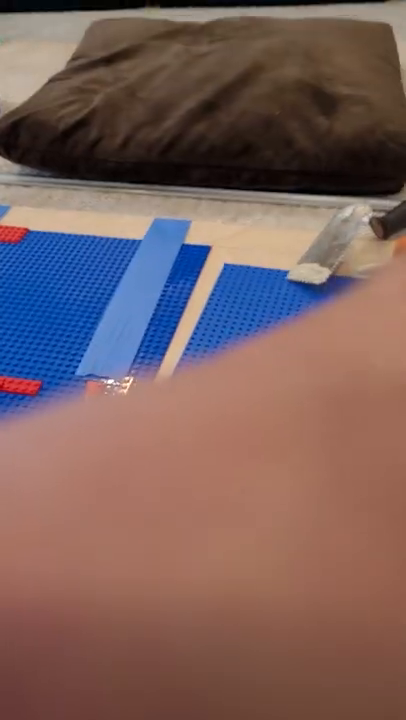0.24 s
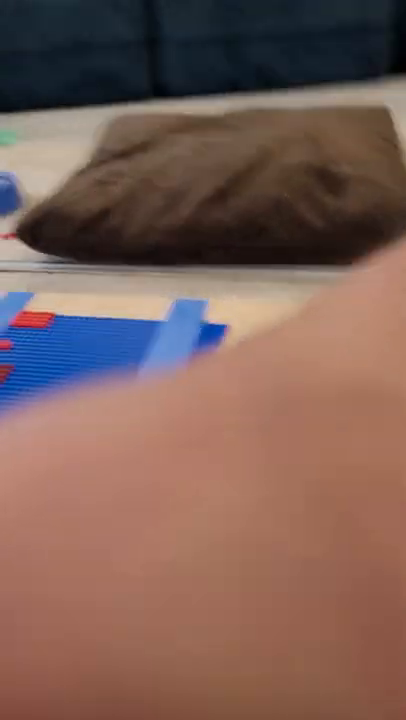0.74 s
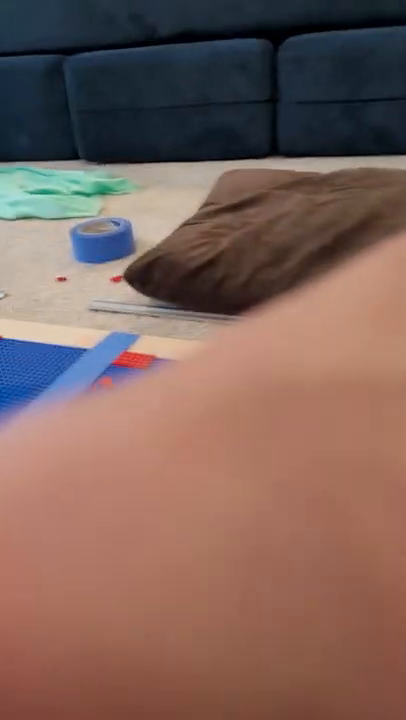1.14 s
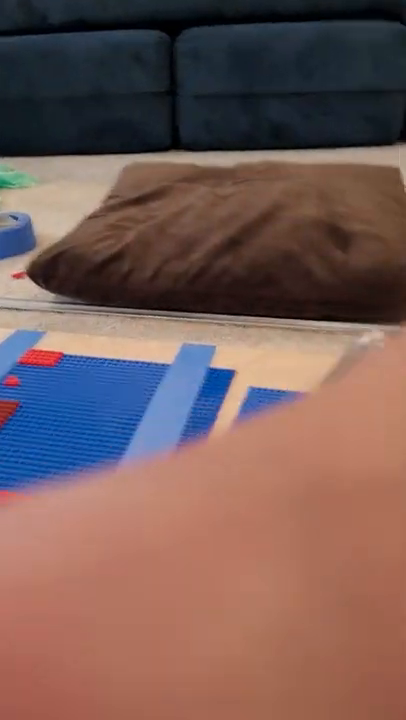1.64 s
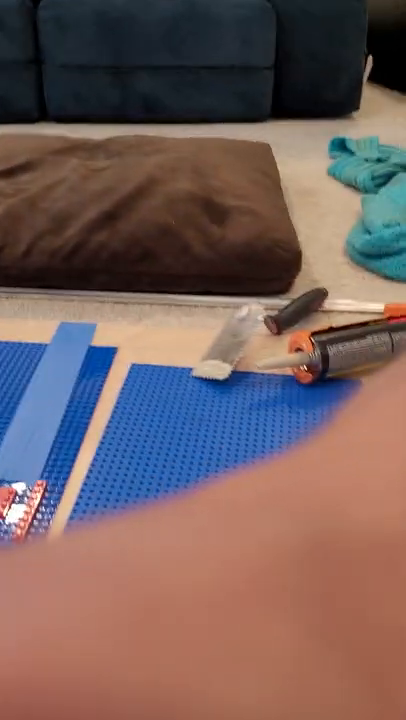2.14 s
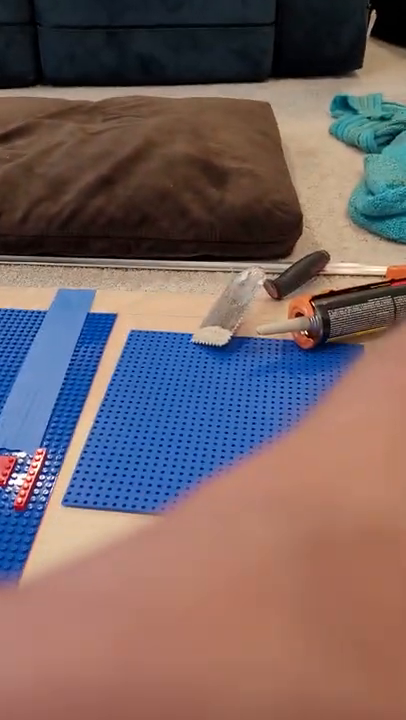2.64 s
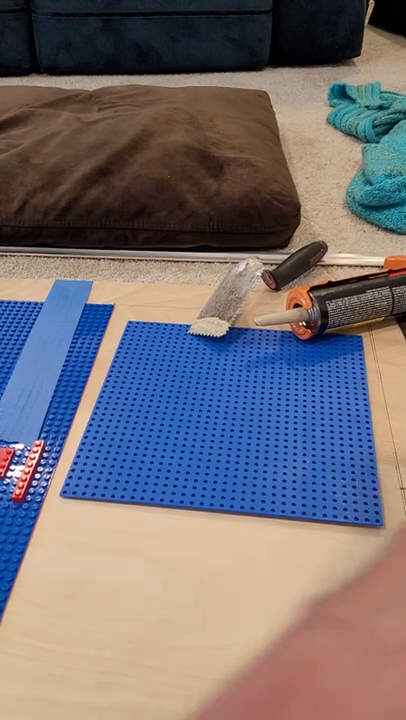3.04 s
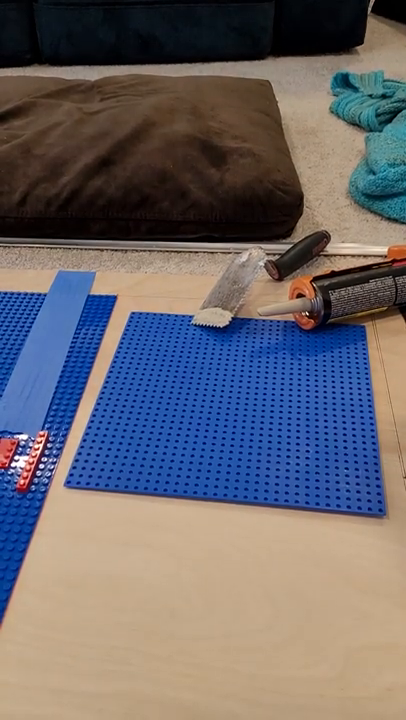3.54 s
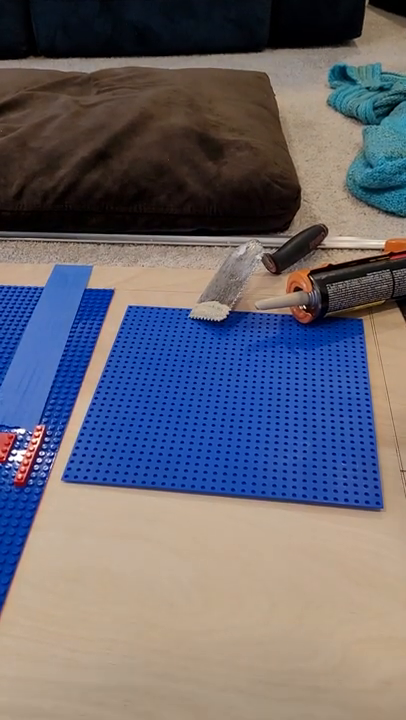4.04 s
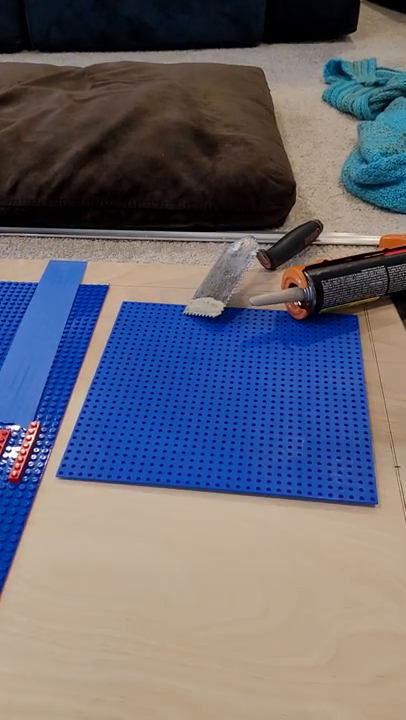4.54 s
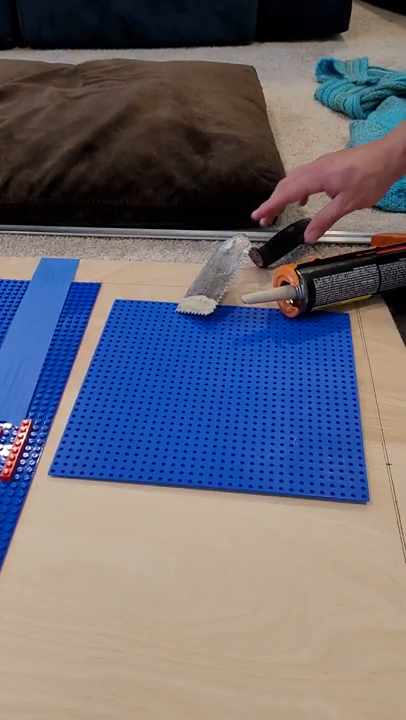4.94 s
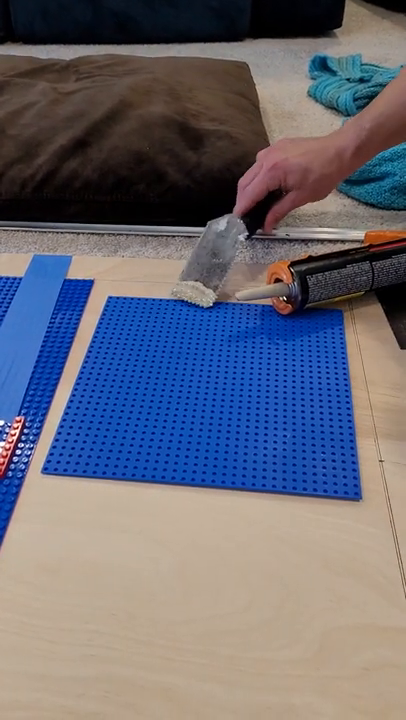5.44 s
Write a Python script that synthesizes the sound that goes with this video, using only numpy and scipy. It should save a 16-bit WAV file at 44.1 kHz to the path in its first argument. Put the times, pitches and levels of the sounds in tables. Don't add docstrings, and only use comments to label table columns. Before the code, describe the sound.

A phone is fumbled in its holder with thumps and rubbing clacks, then steady ventilation hum, and finally a scraper softly peels away.

```python
import sys
import numpy as np
from scipy import signal
from scipy.fft import rfft, irfft
from scipy.io import wavfile
from scipy.ndimage import uniform_filter1d

SR = 44100
rng = np.random.default_rng(int(sys.argv[2]) if len(sys.argv) > 2 else 0)


def makeup_ratio(level_db):
    decades = np.asarray(level_db, float) / 20
    return 10 ** decades


def persist_wave(psi):
    counts = np.round(np.clip(psi, -1, 1) * 32767).astype(np.int16)
    wavfile.write(sys.argv[1], SR, np.atleast_2d(counts).T)


N = 250929
TIME = np.arange(N) / SR

# centre_hz, width_hz, level_db
CASE = [(970, 600, -1), (1605, 1300, 0), (2280, 1100, 1), (3100, 360, -1), (3880, 700, -3), (4450, 660, -2),
        (5360, 440, 3)]
# centre_hz, width_hz, level_db
PORT = [(7870, 4500, -5), (10460, 920, 5), (12160, 2200, 1.5), (16200, 2400, -4.5)]


def unit(x):
    return x / np.sqrt(np.mean(x ** 2))


def peak(x, db):
    return x * makeup_ratio(db) / np.abs(x[1]).max()


def sides(pan_db):
    return makeup_ratio(np.array([[pan_db / 2], [-pan_db / 2]]))


def right_full(left_gain):
    return np.array([[left_gain], [1]])


def add(out, start_s, x):
    i = max(int(start_s * SR), 0)
    out[..., i:i + x.shape[-1]] += x[..., :N - i]


def band(x, hz, width_hz):
    return signal.lfilter(*signal.iirpeak(min(hz, .45 * SR), hz / width_hz, SR), x)


def body(x, modes):
    def through(v):
        return sum((-1) ** k * makeup_ratio(db) * band(v, hz, width) for k, (hz, width, db) in enumerate(modes))

    pulse = np.eye(1, 2048)[0]
    return through(x) / np.sqrt(np.sum(through(pulse) ** 2))


def coloured(modes):
    return body(rng.standard_normal((2, N)), modes)


def twin_noise(likeness):
    near, other = rng.standard_normal((2, N))
    return np.array([np.sqrt(1 - likeness ** 2) * other - likeness * near, near])


def walk(rate_hz):
    k = int(SR / rate_hz)
    steps = np.repeat(rng.standard_normal(N // k + 1), k)
    return unit(uniform_filter1d(uniform_filter1d(steps, k), k)[:N])


def swells(peaks):
    levels_db = []
    for s, hold, db, rise, fall in peaks:
        before = np.maximum(s - TIME, 0)
        after = np.maximum(TIME - s - hold, 0)
        levels_db.append(db - rise * before - fall * after)
    return np.max(levels_db, axis=0)


def ring(modes, push_ms, build_ms, glide, pitch):
    t = np.arange(int(.06 * SR)) / SR
    fresh = np.exp(-t * 1000 / build_ms)
    clock = pitch * np.cumsum(1 + glide * fresh) / SR
    y = sum(makeup_ratio(db) * np.sin(2 * np.pi * hz * clock) * 1000 ** (-t * pitch ** 2 / t60)
            for hz, db, t60 in modes)
    push = np.hanning(int(push_ms * SR / 1000) + 3)
    y = np.convolve(y * (1 - 0.45 * fresh), push)[:len(t)]
    return y / np.abs(y).max()


def hits(table, crack_hz, push_gain, push_ms, build_ms, glide, left_thump_db, hold_ms, tail_ms,
         rattle_ms, rattle_db, pitch=0.96, case=CASE):
    # mode_hz, level_db, t60_s
    near_thump = [(247, -1, 0.019), (636, -12, 0.023)]
    # mode_hz, level_db, t60_s
    far_thump = [(552, 5, 0.036), (280.7, -5, 0.031)]
    left = -makeup_ratio(left_thump_db) * ring(far_thump, push_ms, .5, 0.29, pitch)
    right = ring(near_thump, push_ms, build_ms, glide, pitch)
    thump = push_gain * np.array([left, right])
    t_ms = np.arange(int(.05 * SR)) / SR * 1000
    gate = np.minimum(t_ms / 0.083, 1) * np.exp(-np.maximum(t_ms - hold_ms, 0) / tail_ms)
    rattle_gate = np.exp(-t_ms / rattle_ms)
    spike = np.exp(-((t_ms - .25) / 0.12) ** 2)
    shake = twin_noise(0.64)
    out = np.zeros((2, N))
    for s, crack_db, thump_db, treble_db, pan_db in table:
        noise = shake[:, int(s * SR):][:, :len(t_ms)] * right_full(makeup_ratio(pan_db))
        snap = push_gain * 1.3 * np.array([-makeup_ratio(pan_db) * np.roll(spike, 16), spike])
        source = band(gate * noise + snap, crack_hz, 2.1 * crack_hz)
        crack = body(band(source, crack_hz, 2.0 * crack_hz), case)
        rattle = body(band(band(rattle_gate * noise, 1600, 2200), 1400, 3500), case)
        treble = body(gate * noise, PORT)
        add(out, s, makeup_ratio(thump_db + 10.5) * thump * right_full(makeup_ratio(0.32 * pan_db)))
        add(out, s, peak(crack, crack_db + 1) + peak(rattle, crack_db + rattle_db))
        add(out, s, peak(treble, treble_db + 11) * right_full(makeup_ratio(-14.5)))
    return out


def fan():
    motor_hz = [57.44, 113.7, 120.04, 123., 620.5]
    motor_db = [-48, -51.5, -43.5, -54, -71]
    # centre_hz, width_hz, level_db
    rumble_modes = [(64.15, 29, -46.5), (110, 33, -54)]
    # centre_hz, width_hz, level_db
    whistles = [(613.3, 8.3, -71.5), (234.8, 15, -65.5)]
    # freq_hz, density_db_per_hz
    air = [(25, -32.5), (46, -16), (75, -11.5), (95, -14.5), (150, -14.5), (185, -18.5), (225, -18),
           (370, -29), (620, -35), (800, -42), (1050, -49.5), (1450, -59), (4000, -69), (7000, -77.5),
           (12000, -72.5), (16500, -75.5)]
    # freq_hz, likeness
    alike = [(60, -0.45), (130, 1), (290, 0.66), (640, 0.53), (1410, -0.53), (3100, -0.02), (6820, -0.03),
             (15000, 0.52)]
    # time_s, level_db
    shade = [(0, -3.5), (.06, -7.5), (1.15, -6), (1.4, -2.5), (1.75, 1.5), (2.2, -0.5), (5.69, -0.5)]
    in_step_s, flow_db = 4.12, -51
    hum = sum(makeup_ratio(db + 3) * np.cos(2 * np.pi * hz * (TIME - in_step_s))
              for hz, db in zip(motor_hz, motor_db))
    rumble = sum(makeup_ratio(db) * unit(band(band(rng.standard_normal(N), hz, width), hz, width))
                 for hz, width, db in rumble_modes)
    duct = sum(makeup_ratio(db + 45.5) * unit(band(rng.standard_normal(N), hz, width))
               for hz, width, db in whistles)
    log_hz = np.log(np.maximum(np.fft.rfftfreq(N, 1 / SR), 10))
    air_hz, air_db = np.transpose(air)
    like_hz, like = np.transpose(alike)
    gain = makeup_ratio(np.interp(log_hz, np.log(air_hz), air_db))
    like = np.clip(np.interp(log_hz, np.log(like_hz), like), 0, 1)
    mid, side = rfft(rng.standard_normal((2, N)), axis=1) * gain
    spectra = np.sqrt(1 + like) * mid + np.sqrt(1 - like) * side * np.array([[1], [-1]])
    flow = irfft(spectra, N, axis=1)
    gust_db = flow_db + 6 + 0.65 * walk(9)
    shade_s, shade_db = np.transpose(shade)
    steady = (hum + rumble) * sides(-1.3)
    return (steady + (unit(flow) + duct) * makeup_ratio(gust_db)) * makeup_ratio(np.interp(TIME, shade_s, shade_db))


def skin_rubbing():
    # start_s, end_s, scrape_db, hiss_db, fade_db over the slide
    slides = [(0.111, 0.227, -67.5, -66.5, 15.5), (0.368, 0.429, -68.5, -72.5, 6),
              (0.424, 0.465, -55, -65, 8), (.645, 0.698, -50, -54.5, -2), (0.774, 0.785, -61, -57, -5.5),
              (0.969, 1.023, -67.5, -63, -2.5), (1.019, 1.069, -52, -53.5, -2.5),
              (1.084, 1.129, -36.5, -52.5, -7), (1.241, 1.273, -52, -64.5, -5.5),
              (2.043, 2.056, -59, -64.5, 4), (2.059, 2.076, -35, -36.5, -4),
              (2.116, 2.184, -38.5, -37.5, -19.5), (2.368, 2.407, -64.5, -69, 2),
              (2.546, 2.553, -70, -66, 0), (2.563, 2.573, -70, -66, 0), (2.593, 2.609, -64, -59.5, 3.5)]
    # start_s, hold_s, level_db
    rubs = [(0., .01, -66), (0.14, .2, -74.5), (0.594, .1, -67), (1.152, .45, -68.5), (1.79, .05, -63.5),
            (2.109, .12, -64.5), (2.46, .17, -72)]
    # centre_hz, width_hz, level_db
    skin = [(920, 500, 1), (2190, 1100, -2), (3000, 1000, -2.5), (4500, 1000, -7.5), (6250, 540, -11)]
    slide_pan_db, rise_db_s, fall_db_s, rub_hiss_db = -23, 149.5, 110.5, -13.5
    scrape, hiss = np.zeros((2, 2, N))
    for s, end, scrape_db, hiss_db, fade_db in slides:
        t = np.linspace(0, 1, int((end - s) * SR))
        gate = makeup_ratio(fade_db * t) * np.minimum((1 - t) / 0.23, 1) * np.minimum(t / 0.097, 1)
        gate = gate * right_full(makeup_ratio(slide_pan_db))
        add(scrape, s, makeup_ratio(scrape_db) * gate)
        add(hiss, s, makeup_ratio(hiss_db) * gate)
    rub_db = swells([(s, hold, db, rise_db_s, fall_db_s) for s, hold, db in rubs])
    rub_db = rub_db + walk(72)
    scrape += makeup_ratio(rub_db) * sides(-7.5)
    hiss += makeup_ratio(rub_db + rub_hiss_db) * sides(-15.5)
    noise = twin_noise(.5)
    return body(scrape * noise, skin) + body(hiss * noise, PORT)


def port_releases():
    # start_s, crack_db, thump_db, treble_db, pan_db (left minus right)
    releases = [
        (.0054, -22.5, -29, -61, -9),
        (2.0579, -30, -21, -46, -36),
        (2.1176, -27, -25.5, -47, -46),
        (2.361, -58, -38.5, -80, -2),
    ]
    return hits(releases, 990, push_gain=0.67, push_ms=0.24, build_ms=1.0, glide=0.86, left_thump_db=-12.0,
                hold_ms=0.89, tail_ms=0.44, rattle_ms=2.6, rattle_db=-45)


def buzz(count=7):
    start_s, first_gap_ms, last_gap_ms = 1.689, 6.9, 4.1
    first_db = np.array([-23.5, -27, -30, -15])
    fade_db = np.array([-4.5, -5, -6.5, -1])
    gaps_ms = np.geomspace(first_gap_ms, last_gap_ms, count - 1)
    times_s = start_s + np.cumsum(np.r_[0, gaps_ms]) / 1000
    scatter_db = 1.5 * rng.standard_normal((count, 4))
    levels_db = first_db + np.outer(np.linspace(0, 1, count), fade_db) + scatter_db
    return np.column_stack([times_s, levels_db]).tolist()


def finger_slips():
    # start_s, crack_db, thump_db, treble_db, pan_db (left minus right)
    nail = [
        (.1169, -41.5, -51, -58, -32),
        (.614, -20, -33, -34.5, -23),
        (1.5953, -24, -26.5, -33, -14.5),
    ]
    # start_s, crack_db, thump_db, treble_db, pan_db
    light = [(.3033, -45, -51, -52, -16), (.4978, -65, -58, -65, -13), (.7073, -38, -39, -76, -47),
             (.7689, -38, -53, -42, -11), (.9697, -48.5, -58, -55.5, -23), (1.2208, -39, -40, -64, -28),
             (1.2883, -48.5, -47.5, -79.5, -23.5), (1.4568, -57, -63, -62, -15),
             (1.501, -40.5, -27.5, -59, -27), (1.8524, -37, -62, -36, -6),
             (1.9833, -35.5, -40.5, -55.5, -10), (2., -29, -32, -40.5, -22), (2.0415, -40, -37, -54, -28),
             (2.0923, -60, -46, -83, -28), (2.1083, -54, -46, -46, -35), (2.4062, -44, -48.5, -50, -13),
             (2.4264, -53.5, -61, -75, 2), (2.4411, -63, -65, -51, -9), (2.5377, -57, -69, -61.5, 4),
             (2.601, -36.5, -61, -48.5, -21)]
    # start_s, crack_db, thump_db, treble_db, pan_db
    judder = [(1.6347, -25, -26.5, -29, -12), (1.6623, -22, -24.5, -27, -13.5),
              (1.6707, -25, -27, -30.5, -45), (1.7378, -15, -24, -26.5, -15.5),
              (1.7772, -21.5, -20.5, -35, -21), (1.7837, -22, -27.5, -35.5, -11.5),
              (1.8019, -14, -22, -30.5, -19.5), (1.826, -11.5, -24.5, -32, -10),
              (1.8411, -12.5, -23, -39.5, -9.5)]
    skid = dict(push_gain=-1.1, push_ms=1.5, build_ms=1.0, glide=1.1, left_thump_db=-2.5,
                hold_ms=1.25, tail_ms=0.01, rattle_ms=4.5, rattle_db=-16.0)
    out = hits(nail, 4000, **skid, pitch=1.6)
    out += hits(light, 1350, **skid, pitch=0.96)
    out += hits(judder, 1900, **skid, pitch=1.018)
    return out + hits(buzz(), 1700, **skid, pitch=1.065)


def holder_contact():
    # start_s, crack_db, thump_db, treble_db, pan_db (left minus right)
    creaks = [
        (.2648, -32.5, -51, -71, -22),
        (.3262, -39, -56, -79, -16),
    ]
    # start_s, crack_db, thump_db, treble_db, pan_db
    thuds = [
        (.4521, -37.5, -33, -66.5, -29),
        (.4668, -17.5, -13, -39.5, -41),
    ]
    # centre_hz, width_hz, level_db
    clamp = [(1070, 180, 1.5), (1900, 430, -1.5), (2620, 550, -2), (3880, 300, -1.5)]
    out = hits(creaks, 1000, push_gain=-1.7, push_ms=0.46, build_ms=0.97, glide=0.47, left_thump_db=-15,
               hold_ms=2.2, tail_ms=7.5, rattle_ms=12, rattle_db=-12, case=clamp)
    return out + hits(thuds, 1140, push_gain=-0.84, push_ms=0.06, build_ms=0.57, glide=1.98,
                      left_thump_db=-6, hold_ms=0.35, tail_ms=0.52, rattle_ms=10.0, rattle_db=-17)


def phone_rocking():
    # start_s, swing_hz, level_db
    bumps = [
        (0.465, 55, -40.5),
        (.636, 60, -33),
        (1.501, 170, -33),
        (1.691, 141, -28),
        (2.06, 72, -26.5),
    ]
    decay_cycles = 4.1
    t = np.arange(int(.15 * SR)) / SR
    out = np.zeros((2, N))
    for s, hz, db in bumps:
        swing = np.sin(2 * np.pi * hz * t) * np.exp(-t * hz / decay_cycles * 2)
        add(out, s, makeup_ratio(db) * sides(-6.) * swing)
    return out


def friction_tones(table, pan_db, rough_hz):
    out = np.zeros((2, N))
    rough = walk(rough_hz)
    for s, end, from_hz, to_hz, db in table:
        n, i = int((end - s) * SR), int(s * SR)
        tone = np.sin(2 * np.pi * np.cumsum(np.linspace(from_hz, to_hz, n)) / SR)
        add(out, s, makeup_ratio(db) * sides(pan_db) * tone * rough[i:i + n] * np.hanning(n) ** .6)
    return out


def squeaks():
    # start_s, end_s, start_hz, end_hz, level_db
    chirps = [(2.16, 2.67, 4250, 3950, -80.5), (2.3, 2.35, 11000, 10800, -80), (1.09, 1.106, 850, 800, -32),
              (1.025, 1.065, 11000, 10800, -62), (1.03, 1.044, 2100, 2100, -48),
              (1.03, 1.044, 3000, 2950, -56.5), (.583, .589, 4400, 4300, -64)]
    # start_s, end_s, start_hz, end_hz, level_db
    blade_squeaks = [(4.95, 5.13, 4450, 4400, -74.5), (4.99, 5.17, 2250, 2200, -69),
                     (4.95, 5.12, 9800, 14200, -79), (5.22, 5.27, 8000, 8000, -71),
                     (5.33, 5.39, 10200, 9800, -77), (5.225, 5.3, 2450, 2400, -59)]
    # start_s, end_s, start_hz, end_hz, level_db
    whine = [(5.55, 5.67, 1900, 1900, -76.5)]
    out = makeup_ratio(0.5) * friction_tones(chirps, -13.5, 650)
    out += makeup_ratio(.1) * friction_tones(blade_squeaks, 11, 600)
    return out + friction_tones(whine, 3, 90)


def plastic_knocks():
    # start_s, crack_db, thump_db, treble_db, pan_db (left minus right)
    snaps = [
        (.6322, -10, -25, -33.5, -10.5),
        (.6345, -8, -26, -20.5, -11),
    ]
    # start_s, crack_db, thump_db, treble_db, pan_db
    clacks = [
        (.6414, -27.5, -29, -37, -22),
        (.6809, -19, -47, -32, -8),
        (1.1757, -37.5, -47, -63, -17),
    ]
    # start_s, crack_db, thump_db, treble_db, pan_db
    dull = [
        (1.0725, -10.5, -17.5, -31.5, -17.5),
        (1.1069, -20, -16.5, -54, -46),
        (1.1092, -20.5, -18, -42.5, -16),
        (1.2476, -53, -41.5, -81, -17),
    ]
    # centre_hz, width_hz, level_db
    latch = [(2250, 390, -3), (4570, 890, 1), (5300, 450, 0.5)]
    room_t60_s, room_db = 0.25, -27.5
    tap = dict(push_gain=-0.58, push_ms=0.8, build_ms=0.5, glide=1.34, left_thump_db=1.0,
               hold_ms=1.13, tail_ms=1.63, rattle_ms=6.0, rattle_db=-11)
    knocks = hits(snaps, 4400, **tap, pitch=1.1, case=latch)
    knocks += hits(clacks, 2300, **tap, pitch=0.96)
    knocks += hits(dull, 1200, **tap, pitch=1.048)
    t = np.arange(int(.5 * SR)) / SR
    echo = band(rng.standard_normal((2, len(t))), 1800, 4500) * 1000 ** (-t / room_t60_s)
    echo = echo / np.sqrt(np.sum(echo[0] ** 2))
    room = signal.fftconvolve(knocks[1:], echo, axes=1)[:, :N]
    return knocks + makeup_ratio(room_db) * room


def scraper():
    # peak_s, scrape_db, hiss_db, rise_db_s, fall_db_s
    lift = [
        (4.41, -77, -81, 38.5, 42.5),
        (5.05, -71.5, -72, 120, 40),
        (5.17, -64, -69, 84, 68),
        (5.248, -56.5, -71, 145, 157),
    ]
    # start_s, scrape_db, hiss_db
    ticks = [(5.1494, -67, -57), (5.175, -56, -75), (5.221, -43, -54), (5.2295, -31, -60),
             (5.2876, -40, -63), (5.3124, -58, -75), (5.3497, -48, -72), (5.688, -70, -86)]
    # centre_hz, width_hz, level_db
    blade = [(1560, 500, 4), (2440, 660, 1), (3040, 500, -0.5), (4700, 980, -6), (5700, 1500, -9.5)]
    hold_s, tick_decay_s = .06, .003
    grain_db = 0.72 * walk(92)
    scrape_db = swells([(s, hold_s, db, rise, fall) for s, db, _, rise, fall in lift])
    hiss_db = swells([(s, hold_s, db, rise, fall) for s, _, db, rise, fall in lift])
    scrape, hiss = makeup_ratio(scrape_db + grain_db), makeup_ratio(hiss_db + grain_db)
    decay = np.exp(-np.arange(600) / SR / tick_decay_s)
    for s, low_db, high_db in ticks:
        add(scrape, s, makeup_ratio(low_db - 11.0) * decay)
        add(hiss, s, makeup_ratio(high_db - 1.0) * decay)
    return scrape * sides(3.5) * coloured(blade) + hiss * sides(4.5) * coloured(PORT)


def scene():
    finger = skin_rubbing() + port_releases() + finger_slips()
    phone = holder_contact() + phone_rocking() + plastic_knocks()
    return fan() + finger + phone + squeaks() + scraper()


def band_limit(x):
    return signal.sosfilt(signal.butter(12, 17020, fs=SR, output="sos"), x)


def record(dry):
    thin = signal.sosfilt(signal.butter(2, 35, "high", fs=SR, output="sos"), dry)
    top = signal.sosfiltfilt(signal.butter(10, 15900, "high", fs=SR, output="sos"), thin)
    return band_limit(thin - .85 * top)


dry = scene()
out = record(dry)
persist_wave(out)
```